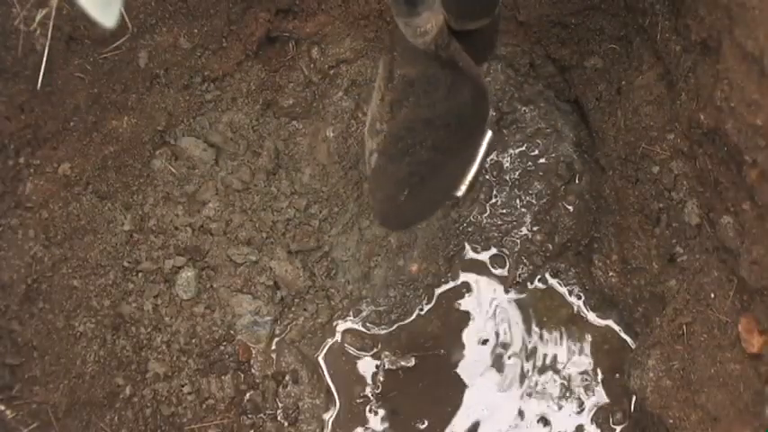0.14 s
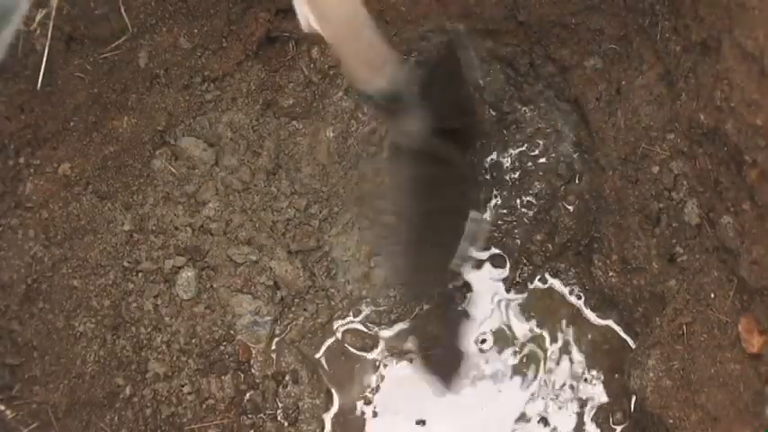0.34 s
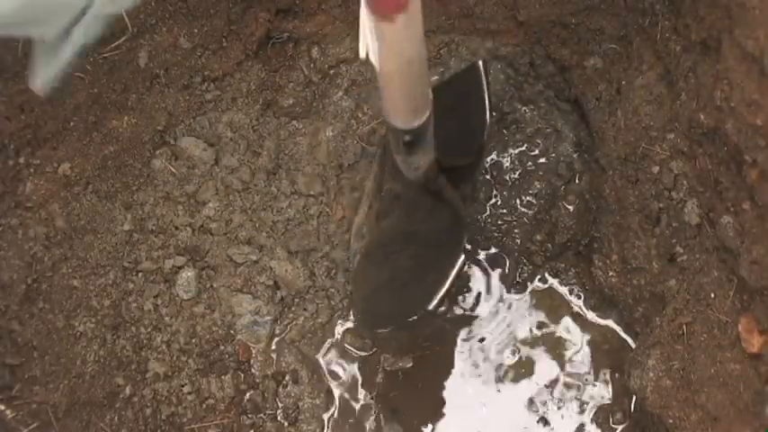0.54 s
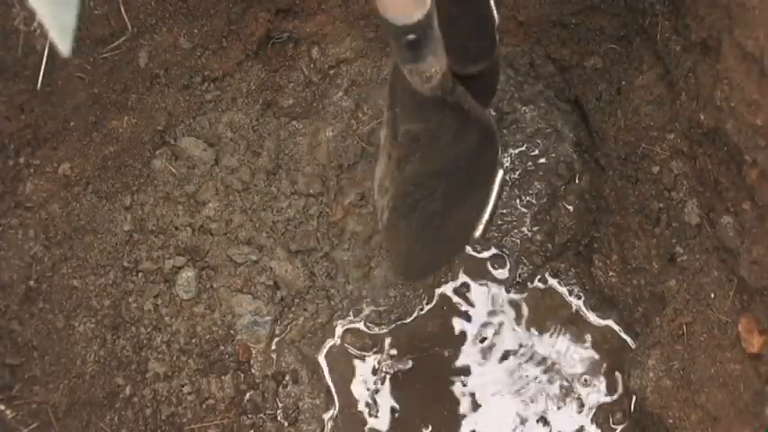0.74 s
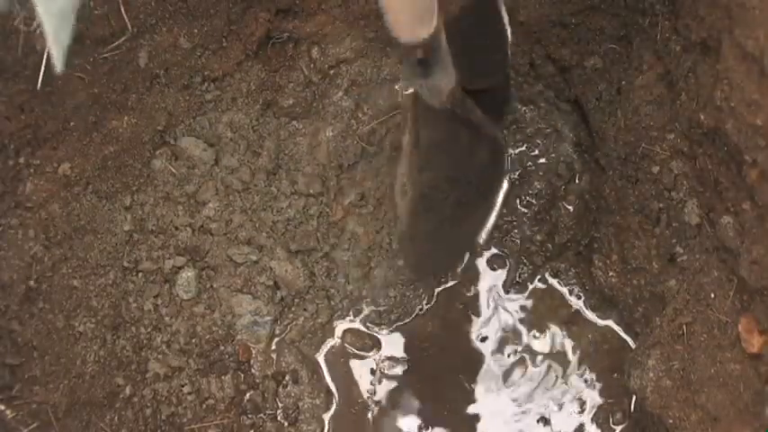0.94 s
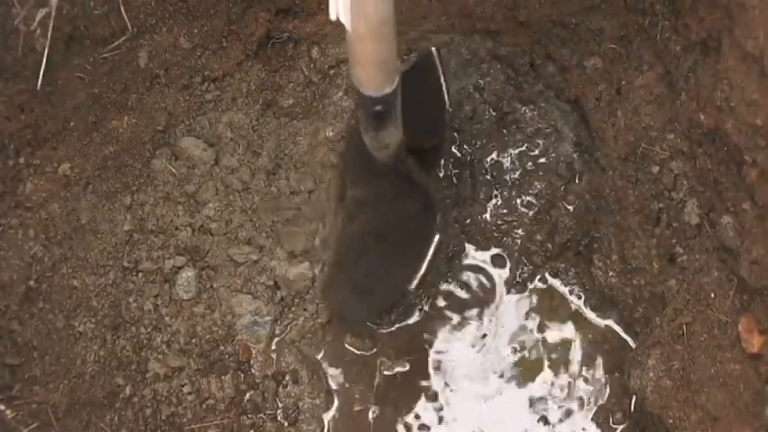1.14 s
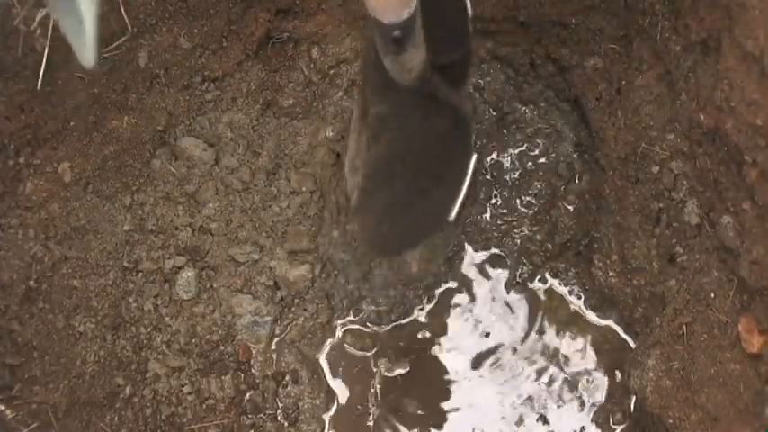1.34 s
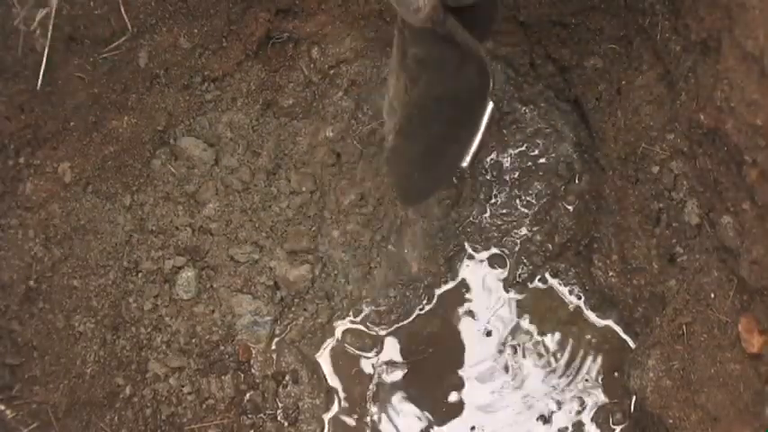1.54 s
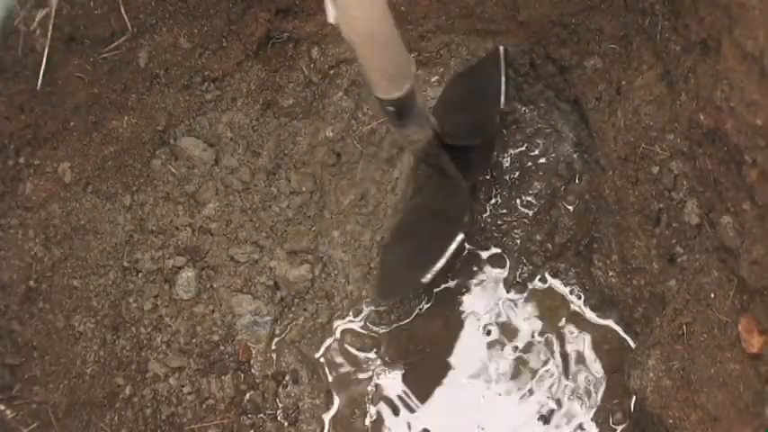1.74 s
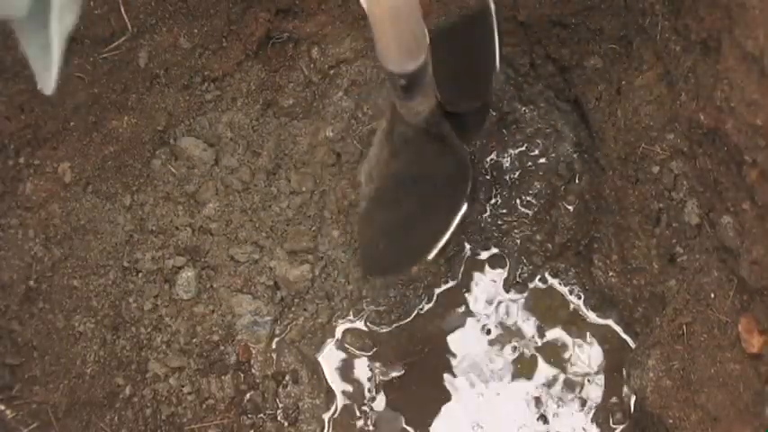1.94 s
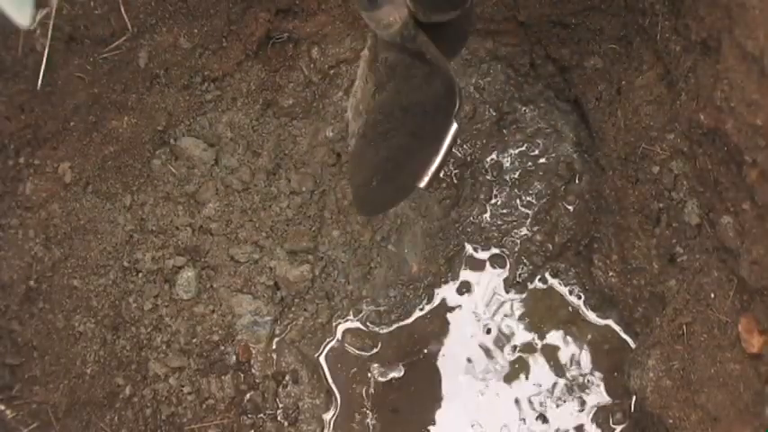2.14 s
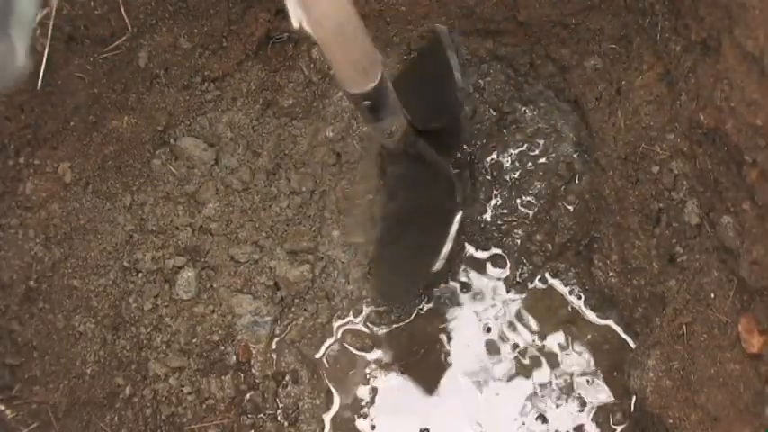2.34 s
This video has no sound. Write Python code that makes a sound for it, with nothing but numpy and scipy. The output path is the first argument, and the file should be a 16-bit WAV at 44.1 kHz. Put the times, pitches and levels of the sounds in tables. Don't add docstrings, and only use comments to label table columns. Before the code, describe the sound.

A steel shovel jabs four times into hard stony soil, crunching, thudding and ringing after each strike

```python
import sys
import numpy as np
from scipy import signal
from scipy.fft import rfft, irfft, next_fast_len
from scipy.io import wavfile
from scipy.ndimage import map_coordinates

SR = 44100
rng = np.random.default_rng(int(sys.argv[2]) if len(sys.argv) > 2 else 0)


def generate_wav(sig):
    pcm = np.round(np.clip(np.atleast_2d(sig).T, -1, 1) * 32767).astype(np.int16)
    wavfile.write(sys.argv[1], SR, pcm)


def voltage_ratio(decibels):
    exponent = np.asarray(decibels, float) / 20
    return 10 ** exponent


N = 106060


def unit(x):
    return x / np.sqrt(np.mean(x ** 2) + 1e-20)


def filtered(x, response):
    size = next_fast_len(len(x) + 8192)
    hz = np.fft.rfftfreq(size, 1 / SR)
    return irfft(rfft(x, size) * response(hz), size)[:len(x)]


def noise(points):
    freq_hz, level_db = np.transpose(points)
    colour = lambda hz: voltage_ratio(np.interp(np.log(hz + 1), np.log(freq_hz), level_db))
    return unit(filtered(rng.standard_normal(N), colour))


def wobble(rate_hz):
    knots = rng.standard_normal(int(N * rate_hz / SR) + 4)
    return map_coordinates(knots, [np.arange(N) * rate_hz / SR])


def peak(hz, width_hz):
    return lambda f: 1j * f * width_hz / (hz * hz - f * f + 1j * f * width_hz)


def seconds(count):
    return np.arange(count) / SR


def fade(level_db, t, t60_s):
    return voltage_ratio(level_db - 60 * t / t60_s)


def sine(hz, t):
    return np.sin(2 * np.pi * hz * t)


def onset(t, rise_s):
    return 1 - np.exp(-t / rise_s)


def add(track, start_s, sound):
    part = track[round(start_s * SR):][:len(sound)]
    part += sound[:len(part)]


def echoes(x, t60_s):
    t = seconds(SR // 3)
    tail = rng.standard_normal(len(t)) * fade(0, t, t60_s)
    return signal.fftconvolve(x, tail / np.linalg.norm(tail))[:N]


# freq_hz, level_db (per Hz)
AIR_COLOUR = [(150, -33.5), (220, -3), (700, -3), (1600, -6), (2600, -12), (5000, -15.5), (7000, -22),
              (16000, -24)]
# time_s, level_db
WIND_GUSTS = [(0, -56), (.3, -53.5), (.6, -60.5), (.68, -42), (.97, -40.5), (1.08, -61), (1.25, -51),
              (1.45, -54), (1.56, -41), (1.68, -59), (1.8, -49.5), (1.95, -42), (2.15, -45), (2.4, -44)]
# freq_hz, level_db
WIND_COLOUR = [(15, -34.5), (30, 14), (60, 2), (100, -3), (160, -49.5), (260, -38), (500, -67.5)]


def outdoors():
    t = seconds(N)
    duck_db, recovery_s = -9.5, 0.16
    duck = sum(duck_db * (t > blow_s) * np.exp(-np.abs(t - blow_s) / recovery_s) for blow_s, *_ in JABS)
    hiss = voltage_ratio(-60 + 1.1 * wobble(3.8)) * noise(AIR_COLOUR)
    traffic = peak(94, 68)
    drone = voltage_ratio(-53) * unit(filtered(rng.standard_normal(N), lambda f: traffic(f) ** 2))
    gusts = voltage_ratio(np.interp(t, *np.transpose(WIND_GUSTS)))
    wind = gusts * unit(voltage_ratio(2.5 * wobble(12)) * noise(WIND_COLOUR))
    return voltage_ratio(duck) * (hiss + drone) + wind


# start_s, length_s, from_hz, middle_hz, to_hz
NEAR_NOTES = [
    (.0, .05, 2900, 3100, 3500),
    (.14, .035, 3700, 3400, 2700),
    (.81, .05, 2900, 3400, 3750),
    (1.405, .04, 3200, 2750, 2800),
    (1.44, .04, 2800, 4600, 5000),
    (1.885, .04, 2900, 4700, 4300),
    (2.05, .055, 3600, 2850, 2700),
    (2.1, .03, 2800, 3900, 4700),
    (.835, .02, 4300, 4900, 4800),
]
# start_s, length_s, from_hz, middle_hz, to_hz
FAR_NOTES = [(.012, .035, 3600, 4900, 3700), (.085, .025, 4300, 4600, 3800), (.205, .03, 3200, 4900, 3600),
             (.232, .025, 3500, 3650, 3700), (.605, .03, 2750, 3600, 5300), (.635, .025, 4000, 4700, 4800),
             (.8, .035, 5800, 5400, 5900), (.82, .03, 2800, 4200, 5000), (.85, .03, 5700, 5100, 4600),
             (.855, .06, 3750, 3820, 3830), (1.255, .045, 4700, 5200, 4700),
             (1.355, .065, 3700, 3700, 3700), (1.465, .03, 5900, 5200, 4000), (1.97, .08, 5500, 4600, 4150),
             (2.06, .04, 3900, 4300, 5400), (2.14, .2, 5100, 5000, 5000), (2.195, .09, 3000, 3350, 3300),
             (1.275, .03, 5200, 4900, 4600), (1.82, .145, 4440, 4440, 4420),
             (1.415, .035, 5900, 5450, 5500)]


def birds():
    out = np.zeros(N)
    accent = [(2.115, .018, 4550, 4680, 4700)]
    sweep_db, octave_db = 4.2, -26
    for notes, level_db in ((NEAR_NOTES, -65), (FAR_NOTES, -69), (accent, -46)):
        for start_s, length_s, *glide_hz in notes:
            u = np.linspace(0, 1, round(length_s * SR))
            pitch_hz = np.polyval(np.polyfit([0, .5, 1], glide_hz, 2), u)
            phase = 2 * np.pi * np.cumsum(pitch_hz) / SR
            swell = np.minimum(5 * np.minimum(u, 1 - u), 1)
            whistle = np.sin(phase) + voltage_ratio(octave_db) * np.sin(2 * phase)
            add(out, start_s, voltage_ratio(level_db + sweep_db * np.ptp(glide_hz) / 1000) * swell * whistle)
    out = out * voltage_ratio(4.5 * wobble(150))
    return out + echoes(out, .12)


# pitch_hz, t60_s, beat_hz (of the close pair), after_null_db (level after its first null)
BLADE = [(452, .3, .6, -18), (630, .3, .5, -18), (1503, 1.6, 1.95, -18), (1599, .55, .8, -18),
         (1858, .45, .8, -18), (1940, .6, 1.4, -18), (2083, .65, 1.5, -18), (2189, .5, 2.8, 14),
         (2751, .6, 2.5, -20), (2960, .17, .5, -18), (3970, .17, .5, -18), (5220, .13, .5, -18),
         (5920, .15, .5, -18), (7520, .09, .5, -18)]
# jab1_db, jab2_db, jab3_db, jab4_db
STRUCK = [(-45.5, -38, -35, -33.5), (-44, -54.5, -40, -74), (-46.5, -40, -35.5, -38),
          (-42.5, -36, -41.5, -36), (-36.5, -41, -42.5, -46), (-36.5, -48.5, -57, -43),
          (-34.5, -40.5, -56.5, -55), (-40, -45, -64, -37), (-33, -29.5, -32, -34), (-35, -30, -39.5, -28),
          (-42.5, -57.5, -40, -44), (-45.5, -62, -54, -48.5), (-51.5, -56.5, -53, -49),
          (-51.5, -54.5, -46, -53)]
FREED = [
    .4175,
    1.078,
    1.712,
    2.362,
]


def ring():
    t = seconds(SR * 2 // 3)
    out = np.zeros(N)
    add(out, 0, fade(-56, t, .6) * sine(2187, t))
    pitch_hz, t60_s, beat_hz, after_null_db = np.transpose(BLADE)[:, :, None]
    swing = np.cos(np.pi * beat_hz * t)
    past_null = beat_hz * t > .5
    pair = np.sign(swing) * np.sqrt(np.abs(swing)) * voltage_ratio(after_null_db * past_null)
    clang = 1 + fade(5, t, .07)
    for free_s, level_db in zip(FREED, np.transpose(STRUCK)):
        tones = np.sin(2 * np.pi * (pitch_hz * t + rng.random(pitch_hz.shape)))
        modes = fade(level_db[:, None], t, t60_s) * pair * tones
        add(out, free_s, modes.sum(0) * clang * onset(t, .002))
    return out


# start_s, level_db (peak), colour_hz
GRIT = [(.048, -36, 5650), (0.204, -34, 4300), (0.457, -47.5, 7000), (.496, -41, 7050), (.559, -49.5, 7000),
        (0.876, -43, 5960), (1.116, -31.5, 5500), (1.145, -44, 7500), (1.164, -42.5, 6000),
        (1.192, -37, 4450), (1.336, -48, 4260), (1.43, -51.5, 7000), (1.534, -46, 2500), (1.784, -50, 6000),
        (1.825, -36, 5000)]


def grit():
    out, t = np.zeros(N), seconds(SR // 10)
    for start_s, level_db, colour_hz in GRIT:
        burst = rng.standard_normal(len(t)) * fade(0, t, .04) * onset(t, 0.0016)
        body = peak(colour_hz, 1.5 * colour_hz)
        add(out, start_s, voltage_ratio(level_db - 3) * filtered(burst, lambda f: body(f) ** 2))
    return out


# start_s, crunch_db, rise_s, t60_s, thud_db
CONTACTS = [(0.347, -8, 0.0016, 0.044, -11), (0.362, -29.5, 0.0049, 0.096, -23.5),
            (0.386, -24, 0.006, 0.19, -37), (.411, -34, .004, 0.031, -22), (0.417, -13, 0.002, 0.035, -20),
            (.43, -26.5, 0.0044, 0.033, -42.5), (1.0239, -6, 0.0011, 0.039, -8.5),
            (1.04, -31.5, 0.0021, 0.048, -25), (1.048, -28, 0.0028, 0.26, -40),
            (1.072, -24, .005, 0.034, -34.5), (1.0805, -16.5, 0.00055, 0.029, -32.5),
            (1.088, -40.5, 0.0033, .12, -47.5), (1.686, -4, 0.0016, 0.045, -12.5),
            (1.7, -33, 0.0026, .05, -27), (1.71, -25.5, 0.0034, .12, -36), (1.744, -28, 0.004, 0.07, -34.5),
            (2.3392, -11.5, 0.0025, 0.052, -12), (2.362, -17.5, 0.003, 0.033, -25),
            (2.372, -25, 0.0037, 0.183, -28)]


def contacts(levels_db, lasts):
    out, t = np.zeros(N), seconds(SR // 3)
    for (start_s, _, rise_s, t60_s, _), level_db in zip(CONTACTS, levels_db):
        add(out, start_s, fade(level_db, t, lasts * t60_s) * np.minimum(t / rise_s, 1) ** 2)
    return out


# freq_hz, level_db (per Hz)
STONE_COLOUR = [(530, -32.5), (900, -7), (1250, -12), (3110, 7), (9540, 1.5), (15200, -4.5), (16500, -34)]
BRIGHTNESS = [3, -3, -4, -5.5, -2.5, -7.5, -2, -1.5, -9, 7.5, 0.5, -16, -3.5, -6, 0.5, -3.5, -1, 10.5, -6.5]


def buried_blade():
    low_hz, high_hz, count, q = 1309.7, 12790, 36, 55
    places = (np.arange(count) + .3 * rng.random(size=count)) / count
    dense_hz = np.sort(low_hz * (high_hz / low_hz) ** places)

    def response(f):
        damped = sum(peak(hz, 22 * 2.2 / t60_s)(f) for hz, t60_s, *_ in BLADE)
        plate = sum((-1) ** k * peak(hz, hz / q)(f) for k, hz in enumerate(dense_hz))
        return voltage_ratio(-8.5) * damped + voltage_ratio(-3) * plate
    return response


def crunch():
    stone = unit(voltage_ratio(1.8 * wobble(1500)) * noise(STONE_COLOUR))
    split_hz = 2680
    treble = filtered(stone, lambda f: 1 / (1 + (split_hz / (f + 1)) ** 4))
    crunch_db = np.transpose(CONTACTS)[1]
    low = contacts(crunch_db, 1) * (stone - treble)
    high = contacts(crunch_db + np.array(BRIGHTNESS), 0.63) * treble
    breaking = voltage_ratio(2) * (low + high)
    return breaking + filtered(breaking, buried_blade())


# freq_hz, level_db
SOIL_COLOUR = [(60, -12.5), (190, -6.5), (300, -4.5), (520, -2.5), (800, -5), (1500, -8), (2600, -14),
               (5000, -43.5)]
# start_s, level_db, pitch_hz
JABS = [
    (0.353, -7.5, 538.4),
    (1.028, -7, 544),
    (1.689, -19.5, 589),
    (2.34, -10.5, 222.7),
]


def thuds():
    t = seconds(SR // 5)
    out = contacts(np.transpose(CONTACTS)[4], 1.15) * noise(SOIL_COLOUR)
    for start_s, level_db, pitch_hz in JABS:
        add(out, start_s, fade(level_db, t, 0.045) * sine(pitch_hz, t) * onset(t, 0.0017))
    return out


# start_s, pitch_hz, level_db, t60_s
CLINKS = [(.349, 3460, -22, .03), (0.35, 4494, -19, .04), (.35, 5685, -20, .04), (0.39, 1516, -30, .08),
          (0.41, 4360, -26, .05), (.418, 2902, -13, .06), (.418, 4930, -16.5, .05), (.42, 7520, -35, .08),
          (.426, 4500, -26, 0.06), (.414, 670, -22, .05), (1.026, 2370, -13.5, .045),
          (1.03, 4110, -11, .025), (1.027, 1536, -19.5, .06), (1.04, 2100, -22.5, .05),
          (1.03, 7600, -42.5, .06), (1.075, 2900, -16.5, 0.03), (1.085, 3400, -21, .03),
          (1.081, 4100, -21, .025), (1.688, 3000, -13, 0.038), (1.687, 1680, -15.5, .05),
          (1.694, 800, -19, .03), (1.688, 4930, -19, .04), (1.713, 5500, -29.5, .07),
          (1.717, 2100, -25, .1), (1.72, 3970, -25, .05), (1.738, 3970, -32, .15), (1.755, 5240, -40.5, .1),
          (1.75, 657, -33, .15), (2.341, 5600, -25, .04), (2.343, 3214, -24, .04), (2.3635, 2850, -14, .04),
          (2.364, 3600, -17, .04), (1.828, 7520, -54, .08), (1.09, 254, -37.5, .2), (.353, 440, -16.5, .05),
          (.354, 720, -14, .04), (1.03, 780, -14.5, .04), (2.36, 700, -22, 0.031),
          (1.195, 3900, -53.5, 0.17)]


def clinks():
    out, t = np.zeros(N), seconds(SR // 5)
    for start_s, pitch_hz, level_db, t60_s in CLINKS:
        add(out, start_s, fade(level_db, t, t60_s) * sine(pitch_hz, t) * onset(t, .001))
    return out * voltage_ratio(2.5 * wobble(200))


def pit_walls(blow):
    return voltage_ratio(-6.5) * filtered(echoes(blow, 0.066), lambda f: 1 / (1 + 1j * f / 2500))


# pitch_hz, t60_s
UPPER_MODES = [(2412, .13), (3300, .08), (3472, .13), (3760, .12), (4016, .2), (4328, .09), (4651, .1),
               (4936, .14), (5230, .14), (5593, .12), (6600, .08), (8300, .07)]


def sheet(scrape, ticks):
    t = seconds(N)
    free_for_s = .2
    free = sum((t > free_s) & (t < free_s + free_for_s) for free_s in FREED)
    modes = lambda f: sum(peak(hz, 2.2 / t60_s)(f) for hz, t60_s in UPPER_MODES)
    return filtered(free * scrape + 2 * ticks, modes)


def scene():
    background = outdoors() + birds()
    ticks = grit()
    scrape = crunch()
    blow = scrape + thuds() + clinks()
    steel = ring() + sheet(scrape, ticks)
    return (background + steel + ticks + blow + pit_walls(blow))[None]


def roll_off(x):
    return signal.sosfilt(signal.butter(12, 17060, fs=SR, output="sos"), x)


def record(dry):
    clip_at = 0.75
    soft = dry[0] / (1 + np.abs(dry[0] / clip_at) ** 4) ** .25
    mix = filtered(soft, lambda hz: hz < 16700)[None]
    return roll_off(mix)


dry = scene()
out = record(dry)
generate_wav(out)
```